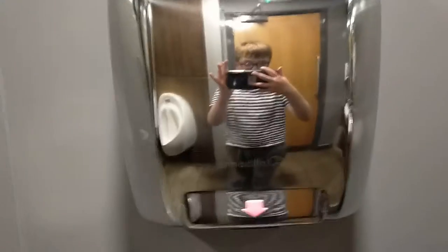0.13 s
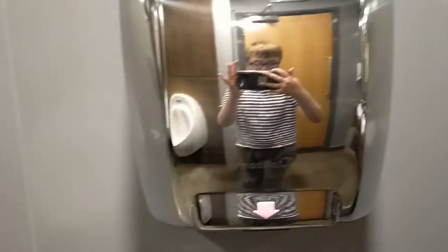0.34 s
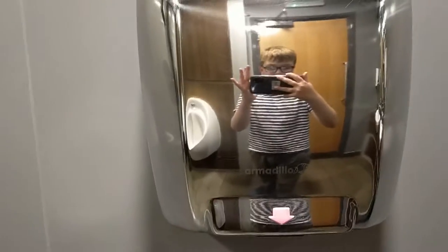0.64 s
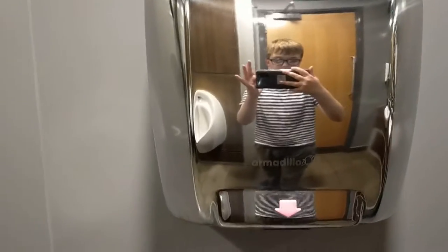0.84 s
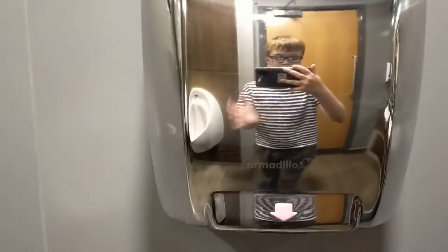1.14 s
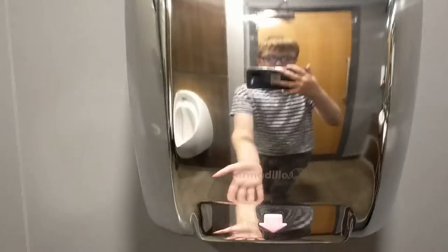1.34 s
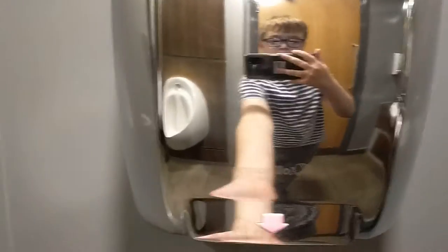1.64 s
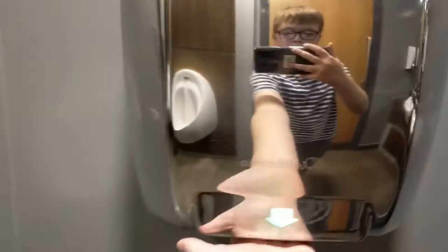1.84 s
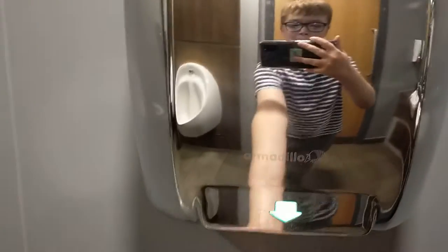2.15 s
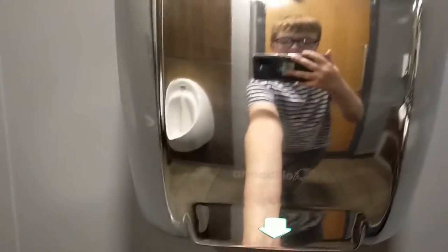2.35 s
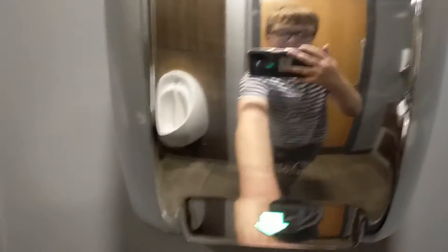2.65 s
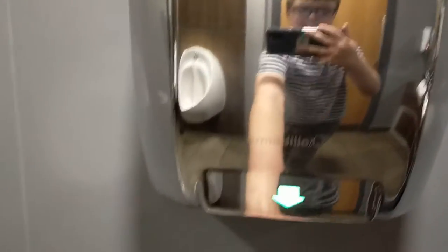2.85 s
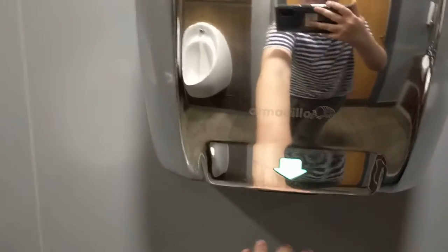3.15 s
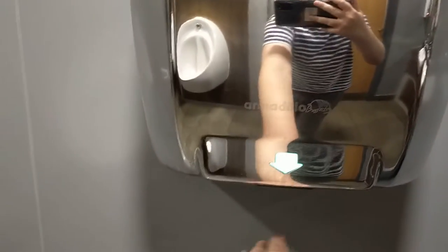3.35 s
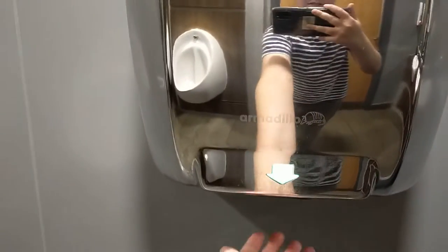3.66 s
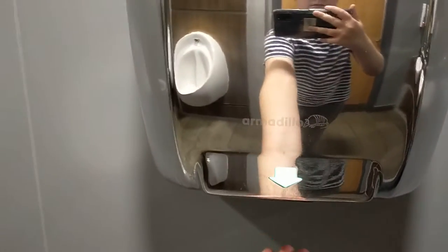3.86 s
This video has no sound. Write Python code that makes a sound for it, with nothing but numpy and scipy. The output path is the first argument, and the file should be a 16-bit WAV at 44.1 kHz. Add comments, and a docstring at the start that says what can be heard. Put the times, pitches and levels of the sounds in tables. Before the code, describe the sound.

An electric hand dryer starts up close by in a small tiled restroom. Silence until 0.2 s, then low room rumble, with small clicks and bumps on the hand-held phone until about 1 s and faint cloth rustle near 1.5. At 1.84 the motor grunts on with a decaying hum and casing buzz; its whine climbs and sinks into a roaring, hissing air jet, full by 2.6, fluttering until the end at 4.

```python
"""Electric hand dryer starting

A quiet, tiled restroom: room rumble, rustling cloth and a few handling clicks on a hand-held phone.
Then a hand dryer close by grunts on with decaying mains hum and casing buzz; harmonics of the shaft sweep
through the housing resonances and sink into shaped noise, the roar and hiss of an air jet that swells and
flutters on a hand. Echoes and a diffuse tail add the tiles; soft low noise is air on the microphone."""
import sys
import numpy as np
from scipy import signal
from scipy.fft import rfft, irfft
from scipy.io import wavfile
from scipy.ndimage import uniform_filter1d, minimum_filter1d

SR = 44100
rng = np.random.default_rng(int(sys.argv[2]) if len(sys.argv) > 2 else 0)


def dump(signal):
    """Clip the signal to [-1, 1] and save it as 16-bit WAV at the path in sys.argv[1]."""
    limited = np.clip(np.atleast_2d(signal).T, -1, 1)
    pcm = np.round(limited * 32767).astype(np.int16)
    wavfile.write(sys.argv[1], SR, pcm)


N = 176400
ON_S, START_RAMP_S = 1.843, 0.014


def undb(db):
    """Decibels to amplitude gain."""
    return 10 ** (np.asarray(db) / 20)


def bins():
    """Frequency axis of the spectrum [Hz]."""
    return np.arange(N // 2 + 1) * SR / N


def colour(points):
    """Level [dB] at every bin, interpolated over log frequency from (Hz, dB) points."""
    hz, db = np.array(points, float).T
    return np.interp(np.log(bins() + 1e-9), np.log(hz), db)


def bell(f, hz, width):
    """Resonance curve: 1 at its centre, 1/2 at half the width to either side."""
    return 1 / (1 + (2 * (f - hz) / width) ** 2)


def noise(gain):
    """Gaussian noise of rms 1, filtered by the gain at every bin."""
    x = irfft(rfft(rng.standard_normal(N)) * gain, N)
    return x / x.std()


def walk(rate_hz):
    """Smooth random motion of rms 1: noise under a Gaussian low-pass, without DC."""
    return noise(np.exp(-.5 * (bins() / rate_hz) ** 2) * (bins() > 0))


def swell(t, at, sigma):
    """Gaussian rise and fall, peak 1."""
    return np.exp(-.5 * ((t - at) / sigma) ** 2)


def bursts(t, table):
    """Short swells of noise, each in its own resonance."""
    out = 0
    for at, sigma, hz, width, db in table:
        out = out + undb(db) * swell(t, at, sigma) * noise(bell(bins(), hz, width))
    return out


def room(t):
    """Ventilation rumble as steady coloured noise, and faint rustles of clothing as noise swells."""
    # room tone: (frequency [Hz], relative density [dB])
    room_colour = [(10, 31.5), (20, 39), (30, 24), (50, 17.5), (100, 7.5), (180, 3.5), (270, -6), (400, -1),
                   (560, -7.5), (850, -11.5), (1300, -9.5), (1900, -14.5), (2750, -13), (3300, -26),
                   (4200, -31), (8000, -39), (16000, -32)]
    # rustles of clothing: (time [s], sigma [s], level [dB])
    rustles = [(0.233, 0.023, -63), (0.367, 0.033, -63.5), (0.833, 0.028, -63), (1.534, 0.13, -60.5)]
    # spectrum of the cloth: (frequency [Hz], relative density [dB])
    cloth_colour = [(100, -9.5), (500, 8.5), (1400, -1.5), (2800, 0.5), (4000, -17.5), (6000, -38.5),
                    (9000, -26.5), (16000, -26)]
    level_db, from_s, fade_s = -61.5, 0.222, 0.03
    tone = noise(undb(colour(room_colour)))
    # the level is the rms above 150 Hz
    rms_above_150_hz = irfft(rfft(tone) * (bins() > 150), N).std()
    rumble = undb(level_db) * tone / rms_above_150_hz
    cloth_level = sum(undb(db) * swell(t, at, sigma) for at, sigma, db in rustles)
    waver = undb(1.0 * walk(60))
    cloth = noise(undb(colour(cloth_colour))) * waver * cloth_level
    return (rumble + cloth) * np.clip((t - from_s) / fade_s, 0, 1)


def taps(t):
    """Fingers knock the phone: a push, duller the longer the contact, and a short ring of the case."""
    # knocks: (time [s], push peak [dB], contact time to peak [s], case ring [dB])
    knocks = [(0.2577, -37, 0.00028, -56), (.2735, -32, 0.00051, -53), (.312, -48, .00004, -60),
              (.360, -39.5, 0.00012, -52), (.401, -35.5, 0.00033, -61), (0.455, -42, 0.0002, -60),
              (.555, -47, .00007, -48), (0.861, -43, 0.00044, -46), (1.0206, -38, 0.00016, -27.5)]
    # modes of the phone case: (frequency [Hz], relative level [dB], T60 [s])
    case_modes = [(106, -6, 0.06), (380, -4, 0.029), (1000, -5.5, 0.012), (1900, -5, 0.0077),
                  (2750, -13, 0.011)]
    out = 0
    for at, push_db, contact, ring_db in knocks:
        age = np.maximum(t - at, 0)
        push = age / contact * np.exp(1 - np.minimum(age / contact, 50))
        ring = 0
        for hz, db, t60 in case_modes:
            decay = undb(db - 60 * np.minimum(age / t60, 10))
            ring = ring + decay * np.sin(2 * np.pi * hz * age)
        out = out - undb(push_db) * push - undb(ring_db) * ring
    return out


def handling(t):
    """The phone is knocked, stroked and rocked: taps, resonant noise swells and slow negative pulses."""
    # skin sliding on the phone: (time [s], sigma [s], centre [Hz], width [Hz], level [dB])
    slides = [(0.244, 0.013, 5140, 2500, -69.5), (0.357, 0.019, 4970, 5000, -80)]
    # phone rocking in the hand: (time [s], sigma [s], peak [dB])
    rocks = [(0.3, 0.016, -29.5), (0.383, 0.026, -27), (0.478, 0.028, -25.5), (0.862, 0.015, -33)]
    rocking = -sum(undb(db) * swell(t, at, sigma) for at, sigma, db in rocks)
    return taps(t) + bursts(t, slides) + rocking


def windings(age):
    """Starting current hums at even mains harmonics and rattles the casing; it decays to a running hum."""
    # hum: (multiple of mains, starting level [dB], rise [s], decay [s], running level before waver [dB])
    hum_tones = [(2, -26, 0.015, 0.11, -47), (4, -31, 0.087, 0.1, -49), (6, -42.5, 0.018, 0.16, -51.5)]
    # casing resonances: (frequency [Hz], half-power width [Hz], relative level [dB])
    casing_modes = [(596, 8.8, -3), (1063, 30, -2), (1370, 72, -19), (2400, 21, -13), (2830, 250, -14.5)]
    mains_hz, waver_db, waver_hz = 49.9, 2, 5
    buzz_db, inrush_s, casing_top_hz = -38, 0.16, 3600
    mains = 2 * np.pi * mains_hz * age
    hum = 0
    for k, start_db, rise, decay, run_db in hum_tones:
        starting = undb(start_db) * np.minimum(age / rise, 1) * np.exp(-age / decay)
        running = undb(run_db + waver_db * walk(waver_hz))
        hum = hum + (starting + running) * np.sqrt(2) * np.cos(k * mains)
    power = sum(undb(2 * db) * bell(bins(), hz, w) for hz, w, db in casing_modes)
    casing = noise(np.sqrt(power) / (1 + (bins() / casing_top_hz) ** 6))
    buzz = undb(buzz_db) * np.exp(-age / inrush_s) * casing
    return hum + buzz * (1 + .5 * np.cos(2 * mains))


def fan(age):
    """The shaft spins up; its tones and the blade swirl flare as they cross the housing resonances."""
    # shaft tones: (multiple of shaft speed, level before flare [dB], roughness [0-1])
    shaft_tones = [(1, -37, .5), (2, -41, .8), (3, -42, .8), (8, -41.5, .35), (9, -42, .3), (18, -69, .3)]
    # housing resonances: (frequency [Hz], two-sigma width [Hz], lift [dB])
    housing = [(197, 36, 12), (335, 46, 6), (2250, 170, 16), (2510, 190, 13), (2760, 220, 15.5),
               (3070, 170, 7)]
    top_speed_hz, fast_s, slow_s = 424, .127, .383
    swirl_db, swirl_width_hz, blades = -46, 170, 9
    full_voice_share = .6  # of top speed
    speed = 1 - (np.exp(-age / fast_s) + np.exp(-age / slow_s)) / 2
    hz = top_speed_hz * speed
    turn = 2 * np.pi * np.cumsum(hz * (1 + .0005 * walk(8))) / SR

    def flare(f):
        """Gain of the housing at the passing frequency."""
        return undb(sum(db * swell(f, centre, w / 2) for centre, w, db in housing))

    tones = 0
    for k, db, rough in shaft_tones:
        size = 1 + rough * (walk(20) + 1j * walk(20))
        size = size / np.sqrt(np.mean(abs(size) ** 2) / 2)  # tone of rms 1
        tones = tones + undb(db) * flare(k * hz) * np.real(size * np.exp(1j * k * turn))
    carrier = np.sqrt(2) * np.cos(blades * turn)
    swirl = undb(swirl_db) * flare(blades * hz) * walk(swirl_width_hz) * carrier
    return (tones + swirl) * np.clip(speed / full_voice_share, 0, 1) ** 4


def jet(t):
    """Turbulent air roars through the cavity resonances and hisses at the nozzle; both flutter together."""
    # air levels before trim: (time [s], roar [dB], hiss [dB])
    air = [(1.85, -49, -66), (1.87, -44, -64), (1.89, -41, -56), (1.91, -43, -62.5), (2.0, -34, -44),
           (2.06, -31, -47.5), (2.14, -26.5, -44), (2.26, -28.5, -42.5), (2.5, -20, -37),
           (2.53, -22.5, -38.5), (2.6, -17.5, -36), (2.72, -25.5, -39.5), (2.77, -20, -35),
           (3.62, -20.5, -34.5), (3.66, -19.5, -36.5), (3.76, -21.5, -35.5), (3.92, -19, -34),
           (4.0, -22.5, -35)]
    # spectrum of the roar: (frequency [Hz], relative density [dB])
    roar_colour = [(25, -42), (60, -29), (110, -14.5), (180, -13), (260, -14), (450, -4.5), (720, -7),
                   (900, -2), (1200, -1.5), (1700, -6), (2300, -1.5), (2700, -2.5), (3100, -6.5),
                   (3700, -20), (4500, -36.5), (9000, -65)]
    # spectrum of the hiss: (frequency [Hz], relative density [dB])
    hiss_colour = [(1500, -17), (3300, 4), (4100, 0.5), (5100, -2), (6200, -8), (7300, -16.5), (8600, -18),
                   (10300, -16), (13000, -20.5), (16000, -19)]
    # resonances of housing and wall gap: (frequency [Hz], width at half the lift [Hz], lift [dB])
    cavity = [(193, 18.5, 5), (295, 15, 6.5), (442, 15, 3.5), (589, 14, 5), (680, 19.5, 7.5), (736, 9.9, 6),
              (857, 30, 5), (994, 29, 4), (1109, 22, 4.5), (1260, 21, 3.5), (1433, 13, 4.5),
              (1800, 17, 3.5), (2505, 24, 1), (2687, 130, 2)]
    # short rushes of air: (time [s], sigma [s], centre [Hz], width [Hz], level before flutter [dB])
    rushes = [(2.002, 0.013, 2900, 350, -32), (2.007, 0.052, 9500, 7000, -59),
              (2.622, 0.023, 2580, 280, -19)]
    roar_trim_db, hiss_trim_db = 2.5, 1.5
    flutter_db, flutter_hz, shimmer_db, shimmer_hz = 0.3, 45, 0.66, 7.3
    edge_hz, edge_start_db, edge_full_s = 1800, -2, 4.1
    s, roar_db, hiss_db = np.array(air).T
    lift_db = sum(db * bell(bins(), hz, w) for hz, w, db in cavity)
    roar = noise(undb(colour(roar_colour) + lift_db))
    # the bright edge of the roar fills in as the jet gathers speed
    edge = roar - irfft(rfft(roar) / (1 + (bins() / edge_hz) ** 8), N)
    edge_gain = undb(np.interp(t, [ON_S, edge_full_s], [edge_start_db, 0]))
    roar = roar + edge * (edge_gain - 1)
    roar = roar * undb(np.interp(t, s, roar_db) + roar_trim_db)
    shimmer = shimmer_db * walk(shimmer_hz)
    hiss = noise(undb(colour(hiss_colour)))
    hiss = hiss * undb(np.interp(t, s, hiss_db) + hiss_trim_db + shimmer)
    return (roar + hiss + bursts(t, rushes)) * undb(flutter_db * walk(flutter_hz))


def tiles(x):
    """The small hard room: early reflections and a short diffuse tail, both weakened in the bass."""
    # reflections from wall, basin and floor, before the bass cut: (delay [s], level [dB])
    echoes = [(.0023, -27), (.0071, -18.5), (0.0115, -21.5)]
    tail_db, t60_s, tail_from_s, diffuse_from_hz = -10.5, 0.44, .008, 900
    age = np.arange(int(.5 * SR)) / SR
    tail = rng.standard_normal(len(age)) * undb(-60 * age / t60_s) * (age > tail_from_s)
    tail = rfft(tail / np.linalg.norm(tail), 2 * N)
    f = np.arange(N + 1) * SR / (2 * N)
    early = sum(undb(db) * np.exp(-2j * np.pi * f * delay) for delay, db in echoes)
    bass_cut = f ** 2 / (f ** 2 + diffuse_from_hz ** 2)
    response = 1 + (early + undb(tail_db) * tail) * bass_cut
    return irfft(rfft(x, 2 * N) * response)[:N]


def buffeting(t):
    """Stray air from the outlet thuds softly on the microphone: low-passed noise."""
    # outflow on the microphone: (time [s], level [dB])
    outflow = [(1.9, -55), (2.05, -44), (3.2, -46), (3.45, -70)]
    thud_hz = 35
    level = undb(np.interp(t, *np.array(outflow).T))
    return walk(thud_hz) * level * np.clip((t - ON_S) / START_RAMP_S, 0, 1)


def scene():
    """The quiet room and the handled phone, then the dryer."""
    t = np.arange(N) / SR
    age = np.maximum(t - ON_S, 0)
    dryer = (windings(age) + fan(age) + jet(t)) * np.clip(age / START_RAMP_S, 0, 1)
    return (room(t) + handling(t) + tiles(dryer) + buffeting(t))[None]


def record(dry):
    """The phone's limiter holds down the highest peaks; a steep low-pass cuts the top."""
    ceiling, hold_samples, cut_hz = .5, 441, 15750
    needed = ceiling / np.maximum(abs(dry), ceiling)
    gain = uniform_filter1d(minimum_filter1d(needed, hold_samples), hold_samples)
    low_pass = signal.ellip(10, .2, 80, cut_hz, fs=SR, output="sos")
    return signal.sosfilt(low_pass, dry * gain)


dry = scene()
out = record(dry)
dump(out)
```